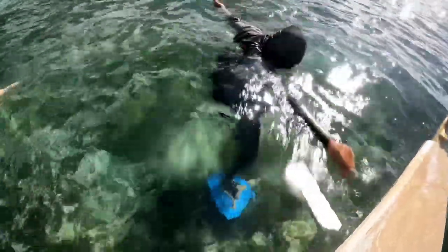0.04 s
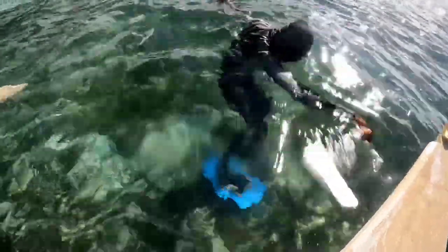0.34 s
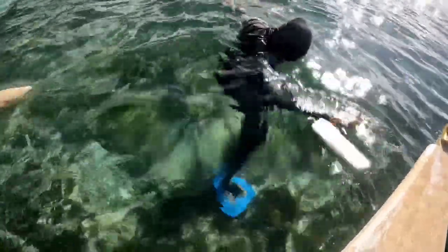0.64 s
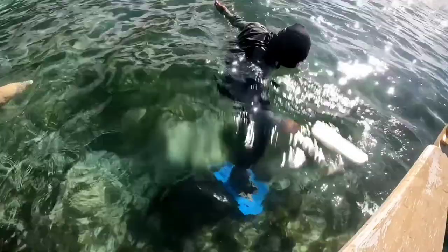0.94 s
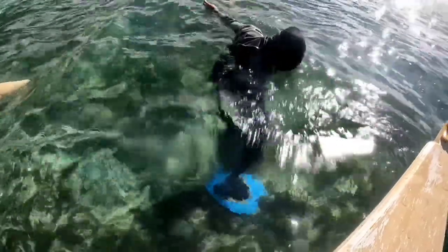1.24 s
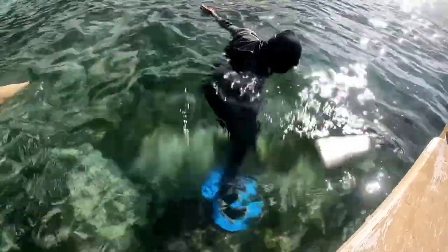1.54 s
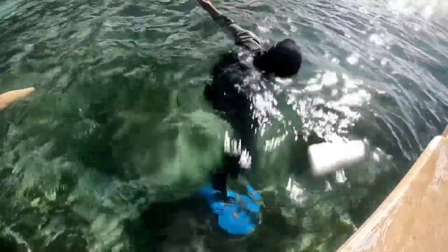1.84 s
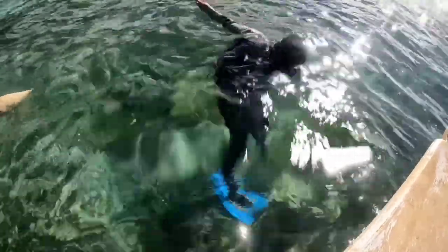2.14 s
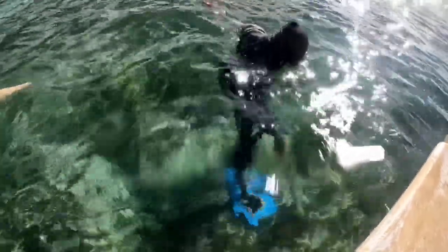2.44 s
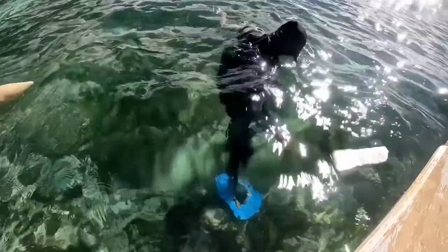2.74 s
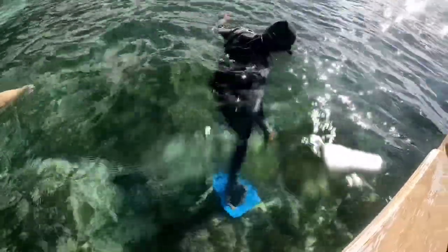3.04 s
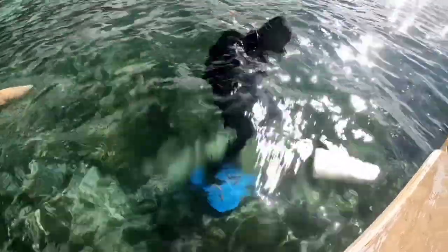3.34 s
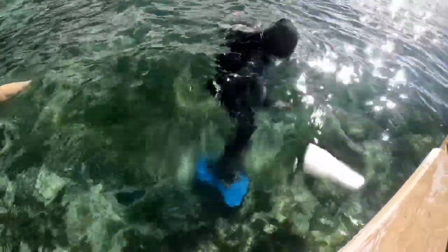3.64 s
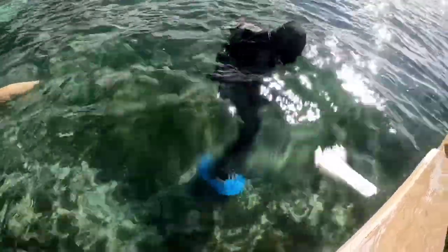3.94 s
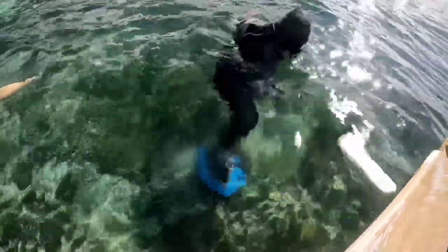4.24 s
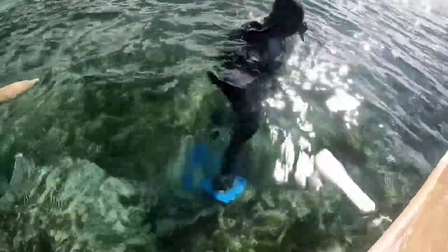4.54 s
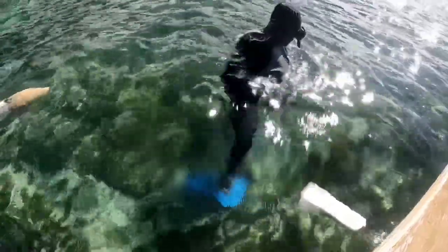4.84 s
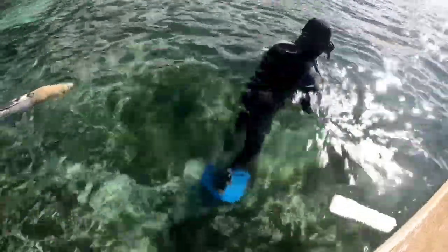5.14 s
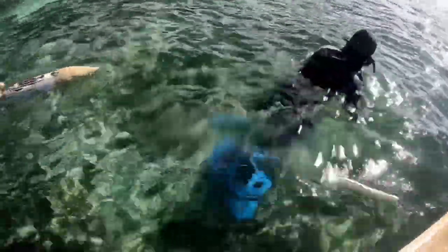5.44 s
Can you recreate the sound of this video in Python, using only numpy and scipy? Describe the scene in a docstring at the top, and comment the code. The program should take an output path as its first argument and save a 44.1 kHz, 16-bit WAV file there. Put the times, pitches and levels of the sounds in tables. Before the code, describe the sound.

Sea water washes and laps against a small wooden boat as a swimmer splashes, with low thumps and wind buffeting the microphone.

```python
"""A swimmer treads water beside a small wooden boat, heard through the hollow case of a camera on board.
From the start the sea washes and fizzes, wind buffets the microphone and water laps at the planks.
An arm sweeps past amid bubble plips, slaps and low thumps of wavelets and wind; then spray falls,
trapped air gurgles out and rolling wavelets set the hull humming. After a quieter spell come hard thumps
near 3 s and 4.5 s, with a thin rising squirt between them, while the breeze freshens to the end."""
import sys
import numpy as np
from scipy import signal
from scipy.fft import rfft, irfft
from scipy.io import wavfile
from scipy.ndimage import uniform_filter1d

SR = 44100
rng = np.random.default_rng(int(sys.argv[2]) if len(sys.argv) > 2 else 0)


def transcribe(signal):
    """Save signal, clipped to [-1, 1], as a 16-bit WAV file at the path in sys.argv[1]."""
    frames = np.atleast_2d(signal).T
    limited = np.clip(frames, -1, 1)
    pcm = np.round(limited * 32767).astype(np.int16)
    wavfile.write(sys.argv[1], SR, pcm)


N = 242550
T = np.arange(N) / SR
HULL_HZ, HULL_WIDTH_HZ = 147.6, 16.7  # the hull's low mode

# resonances and antiresonances of the camera case: f/Hz, bandwidth/Hz, gain/dB
CASE_MODES = [(719, 294, -15), (1720, 400, 7.5), (1903, 1040, -6.5), (3020, 450, 6), (3930, 620, -4),
              (5160, 460, 4), (6320, 97, 7), (11870, 810, 6)]
# correlation of the two microphone ports: f/Hz, coefficient
PORT_CORRELATION = [(60, 0.92), (100, 0.94), (170, 0.72), (300, 0.12), (510, 0.61), (870, 0.058),
                    (1490, 0.8), (2540, 0.26), (4340, 1), (7410, 0.85), (12000, 0.22)]
# left port relative to right: f/Hz, level/dB
PORT_BALANCE = [(60, 2), (87, 9), (130, -9), (180, 4), (260, -3.5), (380, -3), (550, -1.5), (800, -1.5),
                (1160, 1.5), (1680, 4), (2440, 5.5), (3530, 2), (5120, -2.5), (7410, 2)]
# lead of the left port: f/Hz, phase/rad
PORT_PHASE = [(0, -0.91), (600, 0.35), (1030, 0.00077), (1290, -1.1), (1720, 1), (2070, -0.12),
              (2330, 0.64), (2840, 0.81), (3450, -2.2), (3700, 1.15), (4220, 0.67), (4480, -1.27),
              (5430, 0.74), (7580, -0.37)]
# spectra of the noise sources: f/Hz, level/dB
WASH_SPECTRUM = [(150, -34), (500, -8), (800, -1.5), (1050, -1.5), (1600, 1.5), (2600, -2.5), (3400, -7),
                 (4300, -12), (6000, -41), (9000, -41), (14000, -78)]
FOAM_SPECTRUM = [(2500, -27), (4300, 0), (5400, -2), (6600, -3.5), (8000, -11.5), (9200, -19.5),
                 (11000, -26), (13000, -25), (15000, -43)]
WIND_SPECTRUM = [(4, 0), (12, 1), (28, -2), (42, -6), (65, -18.5), (100, -27), (200, -39.5), (300, -60),
                 (600, -81), (2000, -110)]
SLOSH_SPECTRUM = [(120, -15), (200, 0), (245, 3), (310, -8.5), (420, -3.5), (520, -12.5), (680, -18.5),
                  (1000, -22), (3000, -100)]
STROKE_SPECTRUM = [(150, 6), (380, 7.5), (560, 1), (800, -12), (1100, -0.5), (2000, 4.5), (3000, -1),
                   (4100, -3), (5000, -25.5), (7000, -26.5), (10000, -34.5), (14000, -50)]
SPRAY_SPECTRUM = [(700, -20), (1300, -0.5), (2500, 3), (5000, 6.5), (6500, -3), (8500, -20), (11000, -25.5),
                  (13000, -39), (15000, -38)]
# open water, whose chop drives foam and lapping: t/s, wash level/dB, chop level/dB
SEA_STATE = [(0.4, -44.5, -58.5), (0.72, -46.5, -55.5), (1.2, -48, -52.5), (1.7, -45, -48.5),
             (2.55, -44.5, -47.5), (3.08, -44.5, -47.5), (3.3, -41.5, -45.5), (3.76, -43.5, -46.5),
             (4.3, -43.5, -45), (5.0, -45, -46.5), (5.5, -41, -43)]
# small crests spilling over: t/s, half-width/s, level/dB
SPILLING_CRESTS = [(0.615, 0.019, -54), (1.98, 0.12, -54), (2.78, 0.16, -46), (3.2, 0.059, -46),
                   (3.78, 0.18, -45), (4.585, 0.11, -40.5), (4.68, 0.021, -46.5), (4.765, 0.0055, -53),
                   (5.335, 0.018, -45)]
# gusts (+) and lulls (-): t/s, half-width/s, level change/dB
WIND_GUSTS = [(0.02, 0.033, 7), (0.12, 0.065, 1), (0.28, 0.071, -2.5), (0.5, 0.03, 8), (0.67, 0.085, -9),
              (0.85, 0.13, -1), (1.2, 0.079, -1.5), (1.42, 0.032, -4), (1.56, 0.054, -9), (2.55, 0.13, 5.5),
              (2.76, 0.022, 3.5), (3.08, 0.025, -2), (3.22, 0.03, -7.5), (3.4, 0.059, -6),
              (4.12, 0.022, -6), (4.26, 0.054, 3.5), (4.6, 0.018, 7.5), (5.4, 0.16, 1)]
# swells running along the hull: t/s, half-width/s, level/dB
HULL_SWELLS = [(0.05, 0.18, -40.5), (0.45, 0.14, -47.5), (0.87, 0.028, -56), (1.52, 0.2, -51),
               (1.99, 0.057, -46), (2.6, 0.21, -54), (3.22, 0.092, -45.5), (3.6, 0.16, -49),
               (3.85, 0.068, -49.5), (4.22, 0.059, -48.5), (4.56, 0.021, -40.5)]
# rush of an arm through the water: t/s, level/dB
STROKE_ENVELOPE = [(0, -25), (0.05, -33.5), (0.11, -30.5), (0.16, -35), (0.25, -39.5), (0.36, -41.5),
                   (0.6, -74)]
# ringing bubbles: peak t/s, level/dB, f/Hz, width at half height/s
BUBBLES = [(0.0165, -32, 1340, 0.0031), (0.029, -23, 1250, 0.0014), (0.077, -20, 1202, 0.0021),
           (0.0993, -28.5, 1080, 0.0065), (0.0997, -22, 1416, 0.0022), (0.1121, -28, 1730, 0.0038),
           (0.115, -29, 2850, 0.0019), (0.119, -27, 1650, .003), (0.15, -27, 1340, .0025),
           (0.2, -28, 1650, .003),  (0.249, -27, 1900, 0.0017), (0.2493, -23, 3100, .002),
           (0.307, -33, 1090, .0025), (0.316, -22.5, 1270, 0.0023), (0.3432, -22, 1306, 0.0022),
           (0.352, -17.5, 1235, 0.0026), (0.3705, -16, 1120, 0.0037), (0.381, -26, 1260, 0.0022),
           (0.392, -26, 1156, 0.0026), (0.396, -31, 1300, 0.0016), (0.402, -26, 1260, 0.0022),
           (0.413, -18, 3064, 0.00081), (0.4233, -26, 1100, 0.0054), (0.476, -28.5, 3150, 0.0023),
           (0.5054, -24, 3090, .0018), (0.593, -24, 3020, 0.0021), (0.6006, -26.5, 1670, 0.0025),
           (0.62, -32, 2780, .0026), (0.6254, -34, 1600, 0.0037), (0.794, -27, 1315, 0.0024),
           (0.807, -27, 1292, 0.002), (0.991, -32, 1314, 0.0026), (1.3765, -31.5, 3040, 0.0055),
           (1.498, -27, 1284, 0.002), (1.51, -31, 1240, 0.0043), (1.626, -26.5, 1625, 0.0024),
           (1.837, -32.5, 1510, 0.0041), (1.864, -28, 5260, 0.0029), (1.955, -32, 1305, 0.0022),
           (1.979, -31, 1400, 0.004), (2.02, -32, 1760, 0.0039), (2.241, -38, 6200, 0.0018),
           (2.299, -30.5, 3015, 0.0017), (2.345, -39, 1250, .003), (2.531, -27.5, 2970, 0.0024),
           (2.543, -37, 3010, .002), (2.671, -35, 1444, .003), (2.753, -26.5, 2890, 0.0024),
           (2.78, -33, 1770, 0.0039), (2.783, -28.5, 1484, 0.0033), (2.898, -24.5, 1453, 0.0012),
           (2.922, -29, 1265, 0.0036), (3.1956, -30, 1340, 0.0035), (3.2276, -33, 1380, .0037),
           (3.346, -31, 2180, 0.0025), (3.478, -32.5, 1270, 0.0028), (3.817, -24, 1307, 0.0013),
           (3.875, -34, 5000, 0.0013), (3.884, -35, 1260, 0.0024), (3.94, -29, 1330, 0.0021),
           (4.087, -35, 4430, 0.0019), (4.325, -32.5, 4450, 0.0023), (4.57, -30, 1600, 0.0055),
           (4.577, -33, 1496, 0.0037), (4.578, -33, 1010, 0.0093), (4.594, -37, 1366, .003),
           (4.601, -32, 1494, 0.0045), (4.623, -36, 1550, 0.0033), (4.609, -28.5, 5160, 0.0046),
           (4.673, -14.5, 3094, 0.0026), (4.684, -23, 4330, 0.0043), (4.688, -27, 2570, 0.0031),
           (4.7005, -30, 6100, 0.002), (4.7035, -33, 5300, 0.0032), (4.787, -32.5, 1570, 0.0059),
           (4.929, -34, 1190, .003), (4.9735, -33, 1400, .003), (4.9853, -25, 1280, 0.0019),
           (5.042, -29.5, 4430, 0.0028), (5.297, -27.5, 1222, 0.002), (5.3345, -26, 1537, 0.0062)]
# water striking the planks: t/s, level/dB, centre f/Hz, rise/s, decay/s
PLANK_SLAPS = [(0.038, -22.5, 367, 0.0062, 0.013), (0.075, -26, 380, 0.0018, 0.007),
               (0.096, -27, 382, 0.002, 0.0067), (0.122, -29, 310, 0.0066, 0.014),
               (0.9878, -32, 433, 0.0004, 0.014), (0.988, -34, 1150, 0.0004, 0.0065),
               (1.047, -36.5, 420, 0.002, 0.006), (1.42, -39.5, 390, 0.0065, 0.027),
               (1.498, -37.5, 396, 0.0025, 0.0072), (1.976, -39, 397, 0.002, 0.0073),
               (2.9903, -20, 410, 0.00095, 0.0067), (2.9895, -26.5, 1450, 0.0007, 0.0034),
               (3.632, -36.5, 400, 0.002, 0.012), (4.235, -38, 424, 0.004, 0.026),
               (4.238, -33.5, 1150, 0.0026, 0.013), (4.489, -28.5, 317, 0.011, 0.022),
               (4.511, -24, 434, 0.0016, 0.0044), (4.506, -31.5, 1100, 0.0059, 0.012),
               (4.903, -35, 420, 0.0017, 0.0077), (5.212, -33, 400, 0.0016, 0.0061),
               (5.475, -36, 418, 0.0073, 0.034)]
# low thumps, from wavelets striking the hull and wind popping on the microphone: t/s, level/dB, f/Hz
LOW_THUMPS = [(0.04, -9.5, 83), (0.179, -19, 163), (0.186, -5, 149.3), (0.499, -11.5, 127),
              (0.988, -24.5, 168), (1.239, -23, 155.4), (1.284, -17, 138), (2.611, -9, 136),
              (2.942, -15.5, 133), (2.991, 0.5, 146), (3.8, -17, 142), (3.923, -12.5, 139.5),
              (4.172, -24.5, 181), (4.492, -9.5, 167), (4.501, 0, 99.4), (4.512, -4.5, 160),
              (4.574, -12, 109), (4.786, -22, 138), (4.8, -10.5, 140), (4.9085, -11.5, 147),
              (4.961, -21, 148)]
# spray thrown by the arms: t/s, level/dB, tilt above 1 kHz/(dB/octave), decay/s
SPRAY_BURSTS = [(0.22, -41, 16, 0.0017), (0.248, -36, -8, 0.0027), (0.257, -40, -3, 0.0011),
                (0.293, -32.5, -5.5, 0.0022), (0.412, -28.5, -6.5, 0.0026), (0.434, -29, -12.5, .0025),
                (0.448, -34, -5, 0.0012), (0.461, -35, -7, 0.0015), (0.476, -36, -1, 0.0022),
                (0.489, -37, -3, 0.0015), (0.539, -38, -8, 0.0022), (0.57, -41, -1, 0.0022),
                (0.592, -32, -8, .002), (0.603, -37, -1, 0.0042), (0.609, -31.5, 8, 0.002),
                (0.616, -30, -8, 0.0022), (0.62, -34, 1.5, 0.0037), (0.634, -40, 21, .003),
                (0.642, -38, 1, 0.0048), (0.79, -30, -11, .002), (0.955, -33, 1, .001),
                (0.979, -34, 1, .0015), (1.098, -34.5, 4, 0.0021), (1.5131, -28.5, 5, 0.0015),
                (1.5163, -25.5, -6.5, 0.0036), (1.587, -28, -0.5, 0.002), (1.599, -31, 1, 0.0037),
                (1.618, -28, -3, .001), (1.625, -31, -12, .004), (1.972, -29.5, -2, 0.0027),
                (2.005, -31, 2, .0015), (2.4893, -29.5, 2, 0.0023), (2.576, -32.5, 6, .002),
                (2.588, -39, 2, .0015), (2.632, -34, 3, 0.0026), (2.669, -31, -3, 0.0017),
                (2.729, -32.5, 5, 0.0024), (2.755, -28.5, -2, 0.0016), (2.7991, -20.5, 6.5, 0.0018),
                (2.805, -37, 5, 0.0018), (2.828, -28, -2.5, 0.0041), (2.869, -34, 7, .003),
                (2.894, -26, -8, 0.0014), (2.9, -26.5, 10, 0.0012), (3.8633, -26.5, 4, 0.0016),
                (3.929, -28, 5, .001), (4.608, -26, 12, 0.0014), (4.664, -33, 6, 0.0031),
                (4.6835, -27.5, 1, 0.0047), (4.698, -35, 12, 0.004), (4.756, -31, 1, 0.0036),
                (4.766, -30.5, 3, 0.0033), (5.253, -33, 2, 0.0023), (5.339, -29, 2, 0.0037)]
# air escaping after the stroke: t/s, level/dB
GURGLE_ENVELOPE = [(0.27, -70), (0.305, -46), (0.355, -30.5), (0.40, -36.5), (0.44, -43), (0.5, -51)]
# resonances of the trapped air: f/Hz, bandwidth/Hz, level/dB
AIR_POCKETS = [(213.7, 61, 0), (306, 140, 0), (1270, 240, -16.5)]
# longer wavelets rolling along the hull: t/s, half-width/s, level/dB
ROLLING_WAVELETS = [(0.36, 0.03, -26.5), (0.52, 0.014, -22), (2.525, 0.074, -23), (2.665, 0.018, -26),
                    (2.85, 0.027, -29), (3.24, 0.028, -30), (5.0, 0.051, -28)]
# a thin jet of water: t/s, level/dB, f/Hz
SQUIRT_GLIDE = [(4.19, -57, 5040), (4.23, -45.5, 5500), (4.258, -42, 5540), (4.27, -39.5, 5970),
                (4.285, -46, 6240), (4.305, -43, 6400), (4.335, -70, 6400)]


def gain_of(db):
    """Amplitude ratio of a level in decibels."""
    return 10 ** (np.asarray(db) / 20)


def unit_rms(x):
    """Normalisation to an rms of 1."""
    return x / np.sqrt(np.mean(x ** 2) + 1e-20)


def at_hz(points, hz):
    """Interpolation on a logarithmic frequency axis."""
    f, value = np.transpose(points)
    return np.interp(np.log(hz + 1), np.log(f + 1), value)


def envelopes(rows):
    """Amplitude envelopes, interpolated from each level column."""
    s, *columns = np.transpose(rows)
    return [gain_of(np.interp(T, s, db)) for db in columns]


def add(mix, s, sound):
    """Superposition of a sound beginning at time s."""
    part = mix[..., max(round(s * SR), 0):][..., :sound.shape[-1]]
    part += sound[..., :part.shape[-1]]


def coloured(x, response_db):
    """Filtering by a magnitude response in dB; rms 1."""
    size = x.shape[-1]
    hz = np.fft.rfftfreq(size, 1 / SR)
    return unit_rms(irfft(rfft(x) * gain_of(response_db(hz)), size))


def smooth_noise(size, *windows):
    """Noise low-passed by moving averages, their windows in samples; rms 1."""
    x = rng.standard_normal(size)
    for window in windows:
        x = uniform_filter1d(x, window)
    return unit_rms(x)


def wander(span_s):
    """Random modulation with a correlation time of about span_s; rms 1."""
    return smooth_noise(N, int(span_s * SR), int(span_s * SR))


def steadied(x, span_s):
    """Division by the running rms flattens level changes slower than span_s."""
    size = int(span_s * SR)
    power = uniform_filter1d(uniform_filter1d(x ** 2, size), size)
    return unit_rms(x / np.sqrt(power + 0.023))


def bell(s, half_width):
    """Gaussian pulse that falls to 1/e at half_width from time s."""
    return np.exp(-((T - s) / half_width) ** 2)


def surging(waves):
    """Joint amplitude of passing waves: incoherent sources add in power."""
    return np.sqrt(sum((gain_of(db) * bell(s, half_width)) ** 2 for s, half_width, db in waves))


def resonate(x, hz, width_hz):
    """Forced response of a resonator whose frequency may glide; rms 1."""
    phasor = np.exp(2j * np.pi * np.cumsum(hz * np.ones(N)) / SR)
    pole = np.exp(-np.pi * width_hz / SR)
    baseband = signal.lfilter([1], [1, -2 * pole, pole * pole], x / phasor)
    return unit_rms((phasor * baseband).real)


def case_db(hz):
    """Resonance in the camera case imposes peaks and notches: a hollow colour."""
    return sum(db * 2 ** -((2 * (hz - f) / width) ** 2) for f, width, db in CASE_MODES)


def churn(spectrum, ticks_per_s, tick_db, patchy_db=1.5, spread_db=3.5):
    """Many distant bubbles sum to a patchy hiss; near ones tick as separate damped oscillators."""
    noise = signal.stft(rng.standard_normal((2, N)), nperseg=512, noverlap=384)[2]
    patches = uniform_filter1d(rng.standard_normal(noise.shape[1:]), size=7, axis=0)
    patches = unit_rms(uniform_filter1d(patches, size=14, axis=1))
    hiss = signal.istft(noise * gain_of(patchy_db * patches), nperseg=512, noverlap=384)[1][:, :N]
    pitches = np.geomspace(1000, 9000, 28)
    t, ticks = np.arange(1024) / SR, np.zeros(N)
    for hz in pitches:
        strengths = gain_of(spread_db * np.minimum(rng.exponential(1, N), 4))
        onsets = rng.random(N) < ticks_per_s / len(pitches) / SR
        age = hz * t / 2.75  # each rings for a few cycles
        ring = hz * age * np.exp(-age) * np.sin(2 * np.pi * hz * t)
        ticks += signal.oaconvolve(strengths * onsets, ring)[:N]
    water = unit_rms(hiss)
    water[0] += gain_of(tick_db) * unit_rms(ticks)  # common to both ports
    return coloured(water, lambda hz: at_hz(spectrum, hz) + case_db(hz))


def sea(wash_db=2.5, fizz_db=-1.0, crest_foam_db=-6.0, ripple_db=0.62):
    """Bubble clouds radiate the wash of wavelets and the fizz of foam; both rise as a crest spills."""
    wash, chop = envelopes(SEA_STATE)
    crests = surging(SPILLING_CRESTS)
    wash_level = np.hypot(wash, crests) * gain_of(wash_db + ripple_db * wander(0.027))
    foam_level = np.hypot(chop, gain_of(crest_foam_db) * crests) * gain_of(fizz_db)
    return (wash_level * churn(WASH_SPECTRUM, ticks_per_s=400, tick_db=-11.5)
            + foam_level * churn(FOAM_SPECTRUM, ticks_per_s=1000, tick_db=-10))


def wind(start_db=-19.5, freshen_db_per_s=1.6044, flutter_db=1.05, apart_db=-20, lean_db=1.33):
    """Turbulent eddies exert a fluctuating pressure, nearly coherent at the two microphone ports."""
    flutter = flutter_db * smooth_noise(N, 2200, 1500)
    gusts = sum(db * bell(s, half_width) for s, half_width, db in WIND_GUSTS)
    level = gain_of(start_db + freshen_db_per_s * T + gusts + flutter)
    common, apart = coloured(rng.standard_normal((2, N)), lambda hz: at_hz(WIND_SPECTRUM, hz))
    sides = np.array([[-1], [1]])
    eddies = steadied(common, 0.085) + gain_of(apart_db) * sides * apart
    return gain_of(lean_db * sides) * level * eddies


def lapping(chop_db, swell_db):
    """Excitation at the hull: the chop and the passing swells add in power."""
    _, chop = envelopes(SEA_STATE)
    return np.hypot(gain_of(chop_db) * chop, gain_of(swell_db) * surging(HULL_SWELLS))


def slosh(level_db=1.5, uneven_db=3.0):
    """Water slopping along the planks makes low noise, amplitude-modulated by the swells."""
    level = lapping(chop_db=-6.5, swell_db=1.5)
    level *= gain_of(level_db + uneven_db * smooth_noise(N, 2500, 1500))
    return level * coloured(rng.standard_normal((2, N)), lambda hz: at_hz(SLOSH_SPECTRUM, hz))


def hull_murmur(apart_db=-16.0):
    """Random forcing by ripples excites a narrow band around the hull's low mode."""
    common, apart = coloured(rng.standard_normal((2, N)),
                             lambda hz: -20 * np.log10(1 + ((hz - HULL_HZ) / HULL_WIDTH_HZ) ** 2))
    murmur = steadied(common, 0.29) + gain_of(apart_db) * np.array([[-1], [1]]) * apart
    return lapping(chop_db=9.0, swell_db=7.5) * murmur


def arm_stroke(grit_db=1.6):
    """An arm sweeping close by stirs up broadband noise, made gritty by fast modulation."""
    level, = envelopes(STROKE_ENVELOPE)
    grit = gain_of(grit_db * smooth_noise(N, 120))
    rush = coloured(rng.standard_normal(N) * grit, lambda hz: at_hz(STROKE_SPECTRUM, hz) + case_db(hz))
    return level * steadied(rush, 0.015)


def plips(glide=0.029, wobble=0.033, tail_db=-19.0, tail_s=0.0055):
    """A bubble's oscillation swells and fades, its natural frequency rising near the surface."""
    out, t = np.zeros((2, N)), np.arange(-512, 1536) / SR
    for s, db, hz, width in BUBBLES:
        pitch = hz * (1 + glide * np.tanh(t / width) + wobble * smooth_noise(len(t), 24))
        tone = np.sin(2 * np.pi * np.cumsum(pitch) / SR)
        pulse = 2 ** -(2 * t / width) ** 2
        tail = (t > 0) * gain_of(tail_db) * np.exp(-abs(t) / tail_s)
        add(out[0], s + t[0], gain_of(db) * np.maximum(pulse, tail) * tone)
    return out


def slaps(octave_drop_db=29.0):
    """Impact of water on the planks gives a hollow band of noise that decays exponentially."""
    out, t = np.zeros((2, N)), np.arange(16384) / SR
    for s, db, centre_hz, rise, decay in PLANK_SLAPS:
        band = coloured(rng.standard_normal((2, len(t))),
                        lambda hz: case_db(hz) - octave_drop_db * np.log2((hz + 1) / centre_hz) ** 2)
        envelope = (1 - np.exp(-t / rise)) * np.exp(-t / decay)
        add(out, s, gain_of(db) * envelope * steadied(band, 0.014))
    return out


def low_thumps(push_s=0.0041, rise_s=0.0023, mode_t60_s=0.1):
    """A wavelet on the hull or a wind pop on the microphone: a pressure pulse and a damped oscillation."""
    out, t = np.zeros(N), np.arange(16384) / SR
    attack = (1 - np.exp(-t / rise_s)) ** 2
    push = np.exp(-t / push_s)
    for s, db, hz in LOW_THUMPS:
        t60 = mode_t60_s * hz / HULL_HZ  # deeper thumps die sooner
        ring = np.sin(2 * np.pi * hz * t) * gain_of(-60 * t / t60)
        add(out, s, gain_of(db) * attack * (push + ring))
    return out


def splashes(grit_db=-0.5, rise_s=0.00039, patter_db=-22.0, patter_s=0.032, apart_db=3.0):
    """Impact of spray gives a noise burst, then a faint patter of droplets; finer spray is brighter."""
    lead = 256  # samples of silence before the impact
    out, t = np.zeros((2, N)), np.maximum(np.arange(-lead, 3840), 0) / SR
    patter = gain_of(patter_db) * np.exp(-t / patter_s)
    for s, db, tilt, decay in SPRAY_BURSTS:
        envelope = (1 - np.exp(-t / rise_s)) * (np.exp(-t / decay) + patter)
        drops = envelope * rng.standard_normal((2, len(t))) * gain_of(grit_db * smooth_noise(len(t), 30))
        spray = coloured(drops, lambda hz: case_db(hz) + at_hz(SPRAY_SPECTRUM, hz)
                         + tilt * np.log2(np.maximum(hz, 1000)))
        spray *= np.linalg.norm(envelope) / np.linalg.norm(spray, axis=1, keepdims=True)
        add(out, s - lead / SR, gain_of(db) * spray)
    return out * gain_of([[0], [apart_db]])


def gurgle(throb_db=-2.0):
    """Air trapped by the stroke escapes in uneven gulps, exciting the resonances of its pockets."""
    level, = envelopes(GURGLE_ENVELOPE)
    gulps = rng.standard_normal(N) * gain_of(throb_db * smooth_noise(N, 300))
    air = sum(gain_of(db) * resonate(gulps, hz, width) for hz, width, db in AIR_POCKETS)
    return level * steadied(air, 0.068)


def hull_hum(waver=0.082, throb_db=3.0):
    """Sustained forcing by a rolling wavelet holds the hull's low mode in an unsteady hum."""
    cycles = np.cumsum(HULL_HZ * (1 + waver * wander(0.0096))) / SR
    return gain_of(throb_db * wander(0.017)) * surging(ROLLING_WAVELETS) * np.sin(2 * np.pi * cycles)


def squirt(width_hz=650, sputter_db=3.0, sputter_s=0.0046, scatter=0.016):
    """Water forced through a narrowing gap sputters in droplets of scattered, rising resonance."""
    s, db, hz = np.transpose(SQUIRT_GLIDE)
    droplets = rng.standard_normal(N) * gain_of(sputter_db * np.tanh(wander(sputter_s)))
    pitch = np.interp(T, s, hz) * (1 + scatter * wander(0.0055))
    return gain_of(np.interp(T, s, db)) * resonate(droplets, pitch, width_hz)


def ports(pair):
    """Partial coherence: a common and a difference signal combine into the left and right ports."""
    hz = np.fft.rfftfreq(N, 1 / SR)
    common, apart = rfft(pair)
    correlation = at_hz(PORT_CORRELATION, hz)
    common *= np.sqrt((1 + correlation) / 2)
    apart *= np.sqrt((1 - correlation) / 2)
    leftward = gain_of(at_hz(PORT_BALANCE, hz) / 2) * np.exp(0.5j * at_hz(PORT_PHASE, hz))
    return irfft(np.array([(common + apart) * leftward, (common - apart) / leftward]), N)


def scene():
    """Superposition of the surrounding water, the close water, the hull, the thumps and the wind."""
    water = ports(sea() + plips() + splashes() + slosh() + slaps())
    close_water = arm_stroke() + gurgle() + squirt()
    bass = (hull_murmur() + low_thumps()) * gain_of([[-0.5], [0.5]]) + hull_hum()
    return water + close_water + bass + wind()


def record(dry, mono_until_s=0.22, wide_from_s=0.91, cutoff_hz=14500):
    """The image opens from mono to stereo; saturation rounds the strongest gusts; a low-pass follows."""
    width = np.clip((T - mono_until_s) / (wide_from_s - mono_until_s), 0, 1)
    mid = dry.mean(0)
    stereo = mid + width * (dry - mid)
    saturated = stereo / (1 + stereo ** 8) ** (1 / 8)
    faded = saturated * signal.windows.tukey(N, 0.003)
    low_pass = signal.firwin(511, cutoff_hz, window=("kaiser", 9), fs=SR)
    return signal.oaconvolve(faded, low_pass[None], "same")


dry = scene()
out = record(dry)
transcribe(out)
```